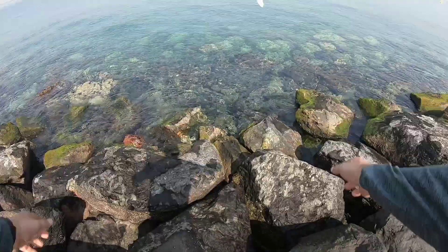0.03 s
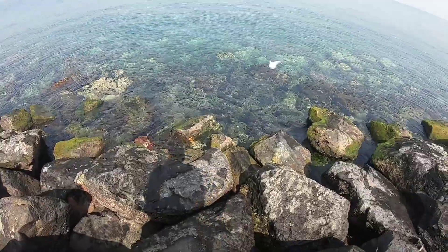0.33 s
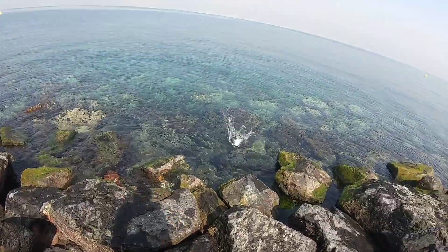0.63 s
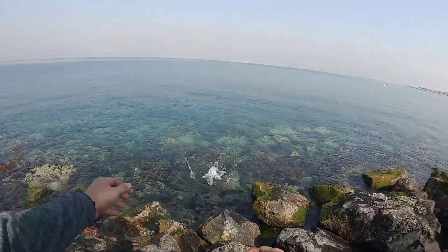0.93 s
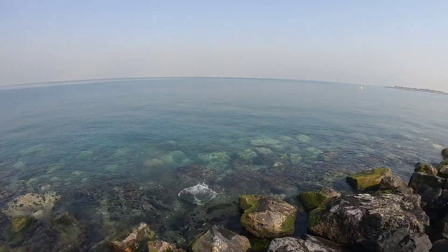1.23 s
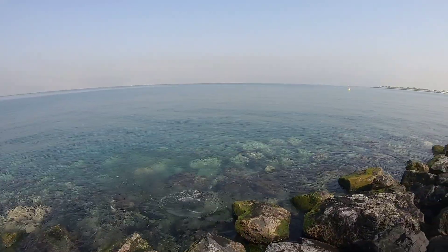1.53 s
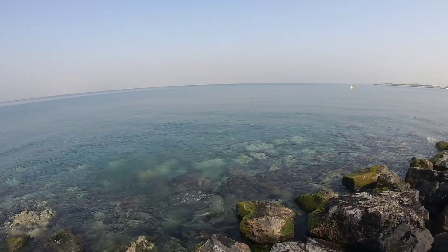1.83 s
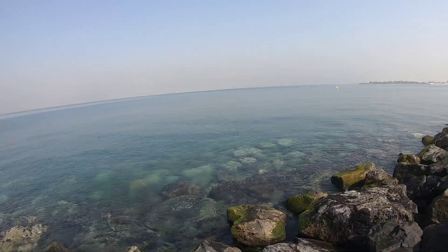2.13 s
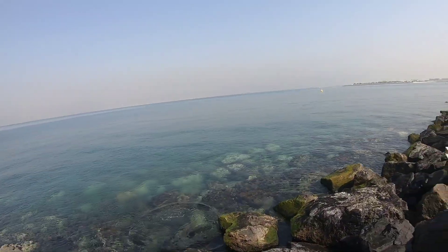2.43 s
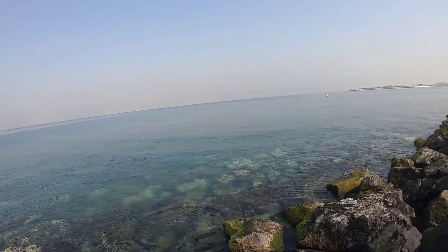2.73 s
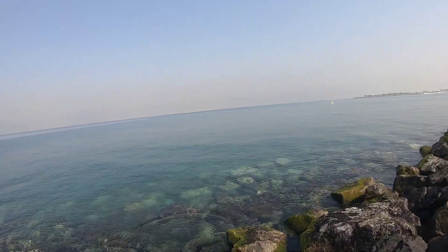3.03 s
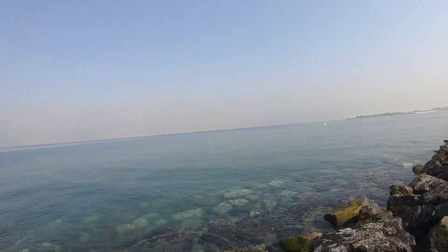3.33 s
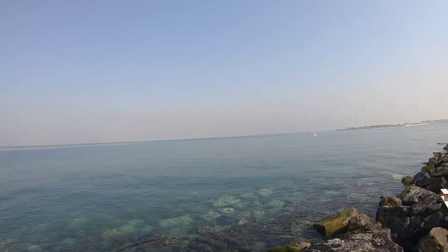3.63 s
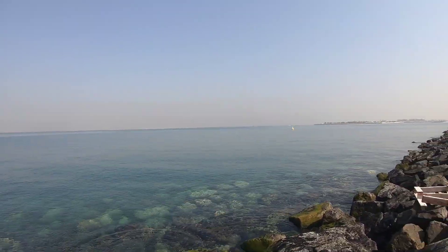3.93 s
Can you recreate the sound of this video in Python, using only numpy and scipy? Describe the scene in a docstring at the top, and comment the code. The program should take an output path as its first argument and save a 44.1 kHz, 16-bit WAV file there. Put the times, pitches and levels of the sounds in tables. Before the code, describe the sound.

Bait plops into the sea, followed by close cloth scraping and bumps over faint lapping.

```python
"""A lump of bait hits a calm sea off a rocky shore: an impact slap, a cavity's gulp, then falling spray.
Drops trap bubbles that ring as small resonators. A sleeve excites the case of a body-worn camera by
stick-slip friction and gear knocks against it; the case shakes the two microphones against each other.
Behind this, wavelets lap and foam among the rocks and light wind buffets the microphone ports.
For a second after the splash the sound is nearly mono."""
import sys
import numpy as np
from scipy import signal
from scipy.fft import rfft, irfft
from scipy.io import wavfile
from scipy.ndimage import uniform_filter1d, map_coordinates

SR = 44100
rng = np.random.default_rng(int(sys.argv[2]) if len(sys.argv) > 2 else 0)


def wav_out(sig):
    """Save sig, one row per channel (or a flat mono array), as 16-bit PCM at SR to the path in sys.argv[1]."""
    wavfile.write(sys.argv[1], SR, np.round(np.clip(np.atleast_2d(sig).T, -1, 1) * 32767).astype(np.int16))


N = 176400

# impact spectrum: f/Hz, relative level/dB
SLAP_SPECTRUM = [(100, -3), (300, 10), (800, 7), (1400, -18), (2200, -0.5), (3000, 0), (4700, -12.5),
                 (6500, -31), (9000, -46), (10600, -69), (12600, -45), (15500, -50)]
ENTRY_S, SLAP_S = .540, .5585


def slap():
    """Water impact: the bait cuts the surface, then slaps it with a short pressure pulse."""
    entry = (1 - burst(ENTRY_S, decay_s=.008)) * burst(ENTRY_S, decay_s=.018)
    force = undb(-32) * entry + undb(-29.5) * burst(SLAP_S, decay_s=.0025)
    return colour(rng.standard_normal(N), SLAP_SPECTRUM) * force


def gulp():
    """Cavity resonance: the air pocket opened by the bait gives a heavily damped, sagging tone."""
    return undb(-24.5) * blip(SLAP_S, hz=258, cycles=.48, glide=-.11)


# spectrum of the falling spray: f/Hz, relative level/dB
SPRAY_SPECTRUM = [(150, -1), (350, 11), (750, 4), (1100, 0.5), (2200, -5.5), (3500, -5.5), (4200, -11),
                  (6000, -14.5), (8500, -27), (10500, -42.5), (13000, -22), (15500, -35)]
# its resonances: f/Hz, bandwidth/Hz, relative level/dB
SPRAY_MODES = [(1440, 89, -15.5), (2076, 270, -12)]
# envelope of the spray and its fizz: t/s, level/dB
SPRAY_LEVEL = [(.53, -71), (.565, -46), (.61, -61.5), (.67, -55.5), (.8, -56), (1.0, -57), (1.2, -54),
               (1.45, -57.5), (1.6, -69.5), (1.9, -103)]


def spray(mist_db=-8, flicker_db=.8):
    """Shot noise: droplets land at random and their impacts add up to a patter."""
    impacts = grains(per_s=800, spread_db=1) + undb(mist_db) * rng.standard_normal(N)
    patter = colour(impacts, SPRAY_SPECTRUM)
    for hz, width_hz, db in SPRAY_MODES:
        patter += undb(db) * ring(grains(per_s=220, spread_db=2.5), hz, width_hz)
    return patter * undb(curve(SPRAY_LEVEL) + flicker_db * walk(per_s=45))


def fizz(rise_per_s=.36):
    """Pitch varies inversely with radius: ever smaller bubbles burst, so the fizz rises for a second."""
    bubbles = ring(grains(per_s=280, spread_db=2.5), hz=3100, width_hz=600)
    pitch_ratio = 1 + rise_per_s * np.minimum(since(SLAP_S), 1)
    rising = map_coordinates(bubbles, [np.cumsum(pitch_ratio)], mode="mirror")
    return rising * undb(curve(SPRAY_LEVEL) - 11)


# single drops and their bubbles: t/s, f/Hz, level/dB
DROPS = [(.648, 377, -39.5), (.657, 3260, -49), (.674, 3070, -47), (.676, 613, -44), (.753, 730, -39),
         (.79, 1960, -50), (.813, 620, -49), (1.019, 326, -43), (1.168, 1000, -50.5), (1.354, 387, -39),
         (1.488, 2340, -50), (1.491, 3300, -51), (1.815, 2560, -66), (1.887, 2480, -60.5),
         (2.134, 935, -49), (2.674, 2920, -48), (2.814, 3050, -55)]


def drops(spatter_db=-10.5):
    """Bubble resonance: each drop spatters and traps air that rings briefly, rising in pitch."""
    out = np.zeros(N)
    for t, hz, db in DROPS:
        spatter = burst(t, decay_s=.0068) * ring(rng.standard_normal(N), hz, width_hz=.37 * hz)
        bubble = blip(t, hz, cycles=3.14 * np.sqrt(hz / 3000), glide=.032)
        out += undb(db) * (undb(spatter_db) * spatter + bubble)
    return out


# broad response of the case: f/Hz, relative level/dB
CASE_SPECTRUM = [(60, -10.5), (200, -2), (450, -1), (750, -2), (1100, 4.5), (1600, -1), (2300, -3.5),
                 (2800, -11), (4000, -18), (5700, -15.5), (7200, -17), (9000, -23), (12000, -34),
                 (15500, -37)]
# its modes: f/Hz, time to fall 60 dB/s, relative level/dB
CASE_MODES = [(1300, 0.025, 5), (1564, 0.031, -13), (2120, 0.036, -1), (3130, 0.075, -35),
              (4020, 0.011, -18)]
# paths to the microphones: f/Hz, left minus right/dB, left phase lead/rad
CASE_PATHS = [(60, -0.5, 0.25), (307, -21, 4.5), (700, -1.5, 2.54), (1550, 0, 2.527), (2500, 0, 2.08),
              (3980, -2, 0.97), (5500, -13, 2.7), (8000, -5.5, 1.8), (12000, 5.5, 2.1)]


def case_response():
    """Structure-borne sound: the case's modes reach each microphone with a different gain and phase."""
    modes = sum(undb(db) * resonance(hz, np.log(1000) / np.pi / t60) for hz, t60, db in CASE_MODES)
    body = response(CASE_SPECTRUM) + modes * tilt(-7.5)
    balance_db, lead = across(CASE_PATHS, col=1), across(CASE_PATHS, col=2)
    both = body * np.array([undb(balance_db / 2) * np.exp(1j * lead), undb(-balance_db / 2)])
    return both / np.sqrt(np.mean(abs(both) ** 2))


# light rubbing of the sleeve: t/s, level/dB
RUSTLE_LEVEL = [(0, -38.5), (.06, -53), (.095, -41), (.13, -50), (.2, -49), (.3, -64.5), (.38, -66),
                (.41, -50), (.48, -59), (.9, -55), (1.7, -67), (2.1, -51), (2.55, -56.5), (2.8, -50.5),
                (3.05, -49.5), (3.25, -49), (3.47, -65.5), (4, -63)]


def rustle(case):
    """Stick-slip friction: cloth drives the case with many tiny slips."""
    slips = grains(per_s=3000, spread_db=2.74)
    return unit(filtered(slips, case * tilt(-4))) * undb(curve(RUSTLE_LEVEL))


# hard stroke of the sleeve: t/s, rasp level/dB, hiss level/dB, rumble level/dB
SCRAPE_LEVELS = [(3.254, -75, -90, -69), (3.258, -29, -57, -39), (3.268, -39, -58, -32.5),
                 (3.285, -32, -63, -22.5), (3.305, -42, -63.5, -33), (3.33, -23.5, -46.5, -27.5),
                 (3.364, -14.5, -28, -20), (3.38, -19, -28.5, -21.5), (3.399, -37.5, -54, -41),
                 (3.41, -34, -48, -32), (3.421, -29, -27.5, -43), (3.434, -49, -44, -49),
                 (3.456, -70, -85, -57)]
# shaking of the mount: f/Hz, relative level/dB
RUMBLE_SPECTRUM = [(20, -22.5), (70, 7), (160, 2), (260, -3.5), (420, -15.5), (650, -12.5), (2000, -64.5)]


def scrape(case, crossover_hz=2940, shared_power=.56):
    """Stick-slip under load: one hard scrape rasps and hisses on the case and shakes the mount."""
    slips = grains(per_s=2500, spread_db=3.74)
    fibres = np.sqrt(shared_power) * slips + np.sqrt(1 - shared_power) * rng.standard_normal((2, N))
    lowpass = 1 / (1 + (freqs() / crossover_hz) ** 8)
    rasp = unit(filtered(slips, case * lowpass)) * undb(curve(SCRAPE_LEVELS, col=1))
    hiss = unit(filtered(fibres, case * (1 - lowpass))) * undb(curve(SCRAPE_LEVELS, col=2))
    shaking = rng.standard_normal(N) + rng.standard_normal((2, N))
    rumble = colour(shaking, RUMBLE_SPECTRUM) * pan(-11) * undb(curve(SCRAPE_LEVELS, col=3))
    in_contact = (since(SCRAPE_LEVELS[0][0]) > 0) * (since(SCRAPE_LEVELS[-1][0]) == 0)
    return in_contact * (rasp + hiss + rumble)


# contacts with the case: t/s; click gain/dB, tilt/(dB per octave), decay/s, cutoff/Hz;
# thump level/dB, f/Hz; mount ring relative to thump/dB; left minus right of thump and ring/dB
KNOCKS = [(.087, -61.5, 8, 0.0067, 10000, -40.5, 415, -5, -16),
          (0.1538, -20, -5.5, 0.0019, 10100, -28, 128, -19, -14.5),
          (0.158, -43, -6, 0.0033, 9000, -32, 220, 0, -16),
          (.184, -37.5, -3.5, 0.0037, 9000, -37, 148, -14, -11),
          (0.404, -36.5, -3, 0.0022, 9000, -52, 203, -20, -7),
          (1.782, -46.5, -8, 0.004, 6000, -38, 172, -7, 1),
          (2.06, -50, -8, .003, 6000, -29.5, 236, -13, -4),
          (2.35, -70, -19, .003, 6000, -29.5, 131, -45, 3),
          (2.670, -48.5, -12, .004, 6000, -38, 224, -9.5, -20),
          (2.728, -37.5, 0, 0.0023, 7000, -61, 200, -14, -12),
          (2.741, -42, -3.5, 0.0036, 7000, -29.5, 206, -12.5, -21.5),
          (2.869, -39, -9.5, 0.0085, 5000, -33, 228, -6.5, -10),
          (2.927, -49, -5, 0.0063, 5001, -33.5, 224, -6, -17),
          (3.019, -42.5, -8.5, 0.0092, 5000, -39, 200, -17, 1),
          (3.188, -42, -3, .004, 6000, -28, 220, -10.5, 8.5),
          (3.289, -11, -0.5, .0015, 9200, -14.5, 69, -18, -15),
          (3.514, -20, 4.5, .0008, 9400, -14, 148.6, -13.5, -18),
          (3.648, -38, 1, .005, 5900, -29, 111, -21, -12),
          (3.713, -27.5, -2, 0.0027, 5500, -12.5, 87.5, -30.5, -3),
          (3.726, -31.5, 1.5, 0.006, 4800, -37, 121.8, -12, -11),
          (3.752, -33.5, 1, 0.0023, 4943, -18, 110, -18, 2.5),
          (3.7602, -23, -1.5, 0.0027, 4250, -46, 110, -19.5, -15.5),
          (3.804, -38, -2, .001, 4500, -38, 200, -9, -0.5),
          (3.8224, -20.5, -1, 0.0011, 4800, -35, 150, -2, 0.5)]


def knocks(case, mount_hz=414, mount_peak_s=.0034, left_lag_s=.0015):
    """Impulse excitation: a contact clicks through the case, duller when soft, and rocks the mount."""
    out = np.zeros((2, N))
    for t, click_db, tilt_db, decay_s, cutoff_hz, thump_db, hz, mount_db, pan_db in KNOCKS:
        contact = rng.standard_normal(N) * burst(t, decay_s)
        softness = 1 / np.sqrt(1 + (freqs() / cutoff_hz) ** 8)
        out += undb(click_db) * filtered(contact, case * tilt(tilt_db) * softness)
        thump = np.array([blip(t + lag, hz, cycles=.5, glide=-.18) for lag in (left_lag_s, 0)])
        mount = undb(mount_db) * blip(t, mount_hz, cycles=mount_hz * mount_peak_s, glide=-.1)
        out += undb(thump_db) * pan(pan_db) * (thump + mount)
    return out


# creaks of the case: t/s, f/Hz, half length/s, level/dB
CREAKS = [(3.293, 1310, 0.0047, -20.5), (3.346, 1570, 0.014, -25), (3.365, 1570, 0.011, -16.5),
          (3.361, 2950, 0.0061, -29.5), (3.381, 2100, 0.011, -21), (3.416, 1510, 0.0095, -21),
          (3.419, 2220, 0.0057, -26.5), (3.516, 1586, 0.00305, -30.5), (3.765, 1100, 0.0037, -37),
          (3.763, 3950, 0.0027, -43)]


def creaks(case):
    """Friction-driven resonance: cloth or gear catches briefly and the case creaks on one pitch."""
    paths = case / np.sqrt(np.mean(abs(case) ** 2, axis=0))  # keeps only balance and phase
    creaking = np.zeros(N)
    for t, hz, half_s, db in CREAKS:
        slips = grains(per_s=2000, spread_db=1)
        creaking += undb(db) * swell(t, half_s) * ring(slips, hz, width_hz=220)
    return filtered(creaking, paths)


# modes of the loose gear: f/Hz, bandwidth/Hz, relative level/dB
GEAR_MODES = [(2730, 260, 1.5), (3650, 350, 5), (3920, 260, 2), (4740, 300, -1.5), (5984, 110, -10)]
# envelope of its rattle: t/s, level/dB
GEAR_LEVEL = [(3.45, -110), (3.53, -70.5), (3.68, -84.5), (3.73, -56), (3.79, -77.5), (3.823, -52),
              (3.85, -87), (3.91, -71), (3.94, -83.5), (3.98, -64.5)]


def gear():
    """Modal ringing: small collisions make loose fishing gear rattle faintly around the last knocks."""
    chatter = np.array([grains(per_s=400, spread_db=4) for _ in range(2)])
    ringing = sum(undb(db) * ring(chatter, hz, width_hz) for hz, width_hz, db in GEAR_MODES)
    return unit(ringing) * undb(curve(GEAR_LEVEL))


# spectrum of the wind on the ports: f/Hz, relative level/dB
WIND_SPECTRUM = [(15, -12), (35, -3), (55, -3), (90, -8), (140, -15.5), (250, -21), (500, -40), (2000, -75)]
# envelope of the gusts: t/s, relative level/dB
WIND_LEVEL = [(0.0, -24), (.03, -37.5), (0.11, -46), (0.14, -39.5), (0.37, -60), (1.2, -46), (2.18, -44),
              (2.23, -36), (2.48, -48.5), (2.61, -33), (2.64, -45.5), (3.24, -35), (3.3, -22), (3.48, -50),
              (3.52, -23), (3.62, -58.5), (3.72, -26), (3.87, -55), (4.0, -32.5)]


def wind(gain_db=-2.5, buffet_db=3, shared_power=.44):
    """Turbulence: eddies press on the two microphone ports, partly in common."""
    shared = np.sqrt(shared_power) * rng.standard_normal(N)
    local = np.sqrt(1 - shared_power) * rng.standard_normal((2, N))
    level_db = curve(WIND_LEVEL) + gain_db + buffet_db * walk(per_s=12)
    return colour(shared + local, WIND_SPECTRUM) * undb(level_db) * pan(-7)


# spectrum of the sea wash: f/Hz, relative level/dB
SEA_SPECTRUM = [(40, -15.5), (100, -3.5), (200, -2), (400, -8), (600, -19), (1000, -24.5), (2000, -28),
                (2800, -37.5), (4000, -33.5), (6000, -51.5), (10000, -58.5), (15500, -58.5)]
# its envelope: t/s, level/dB
SEA_LEVEL = [(0, -59), (.5, -48), (1.1, -55), (1.65, -48), (1.85, -54.5), (2.2, -54), (3.2, -53.5),
             (3.5, -63), (4, -57)]


def sea(flicker_db=1, side_db=-9):
    """Modulated noise: wavelets wash and trickle among the rocks, each octave varying on its own."""
    water = rng.standard_normal(N) + grains(per_s=460, spread_db=3)
    wash = np.zeros(N)
    for hz in np.geomspace(50, 12800, num=9):
        octave = filtered(water, abs(resonance(hz, hz / 2)) ** 2)
        wash += octave * undb(flicker_db * walk(per_s=14))
    side = undb(side_db) * colour(rng.standard_normal(N), SEA_SPECTRUM) * np.array([[1], [-1]])
    return (colour(wash, SEA_SPECTRUM) + side) * undb(curve(SEA_LEVEL))


# short pitched gurgles of water: t/s, f/Hz, half length/s, level/dB
GURGLES = [(0.032, 1300, 0.067, -58.5), (0.017, 2000, .04, -63), (.41, 3100, 0.014, -61),
           (0.574, 220, 0.013, -46), (0.69, 485, 0.041, -53.5), (1.683, 1670, 0.033, -66.5),
           (2.3, 330, 0.021, -58), (2.365, 1060, 0.0055, -61.5), (2.4, 2050, .018, -63),
           (2.555, 2040, .045, -64.5), (2.62, 1190, 0.11, -63), (2.92, 425, 0.021, -52.5),
           (3.043, 482, .04, -53.5)]


def gurgles():
    """Damped resonance: water from the splash and from lapping wavelets gives short pitched gurgles."""
    out = np.zeros(N)
    for t, hz, half_s, db in GURGLES:
        trickle = grains(per_s=900, spread_db=2)
        out += undb(db) * swell(t, half_s) * ring(trickle, hz, width_hz=.16 * hz)
    return out


# envelope of the foam: t/s, level/dB
FOAM_LEVEL = [(1.9, -100), (2.3, -85), (3.08, -80.5), (3.18, -74), (3.45, -78.5), (3.55, -100)]


def foam():
    """Shot noise: dense tiny pops merge into a hiss as a foaming wavelet climbs the rocks."""
    pops = grains(per_s=4000, spread_db=3) + rng.standard_normal((2, N))
    return ring(pops, hz=7300, width_hz=7000) * undb(curve(FOAM_LEVEL))


# envelope of the drone: t/s, level/dB
DRONE_LEVEL = [(0, -64), (.7, -59), (1.25, -45), (1.6, -52.5), (2.1, -51.5), (4, -60.5)]


def drone():
    """Narrow-band noise: a low drone swells and fades."""
    return ring(rng.standard_normal(N), hz=94, width_hz=26) * undb(curve(DRONE_LEVEL))


def undb(db):
    """Amplitude ratio of a level."""
    return 10 ** (np.asarray(db) / 20)


def unit(x):
    """Normalisation to rms 1."""
    return x / np.sqrt(np.mean(x ** 2))


def pan(db):
    """Channel gains for a level difference, left minus right."""
    return undb(np.array([[db], [-db]]) / 2)


def curve(rows, col=1):
    """Linear interpolation of a time table at every sample."""
    rows = np.array(rows)
    return np.interp(np.arange(N) / SR, rows[:, 0], rows[:, col])


def freqs():
    """Bin frequencies in Hz, at least 1."""
    return np.maximum(np.arange(N // 2 + 1) * SR / N, 1)


def across(rows, col=1):
    """Log-frequency interpolation of a table at every bin."""
    rows = np.array(rows)
    return np.interp(np.log(freqs()), np.log(rows[:, 0]), rows[:, col])


def response(rows):
    """Minimum-phase response of a spectrum table, by folding the cepstrum."""
    cepstrum = irfft(np.log(undb(across(rows))), N)
    cepstrum[1:N // 2] *= 2
    cepstrum[N // 2 + 1:] = 0
    return np.exp(rfft(cepstrum))


def filtered(x, gain):
    """Convolution as a product of spectra."""
    return irfft(rfft(x) * gain, N)


def colour(x, rows):
    """Spectral shaping by a table, to rms 1."""
    return unit(filtered(x, response(rows)))


def resonance(hz, width_hz):
    """Second-order band-pass response, gain 1 at the centre."""
    return 1 / (1 + 1j * (freqs() ** 2 - hz ** 2) / (freqs() * width_hz))


def ring(x, hz, width_hz):
    """Forced response of two like resonators in cascade, to rms 1."""
    return unit(filtered(x, resonance(hz, width_hz) ** 2))


def tilt(db_per_octave, pivot_hz=1500):
    """Spectral slope starting two octaves below the pivot."""
    return undb(db_per_octave * np.log2(np.maximum(freqs() / pivot_hz, .25)))


def walk(per_s):
    """Slow random fluctuation of rms 1."""
    hold = int(SR / per_s)
    steps = np.repeat(rng.standard_normal(N // hold + 1), hold)
    return unit(uniform_filter1d(steps, hold)[:N])


def grains(per_s, spread_db):
    """Random impulse train of rms 1, a few impulses much larger than the rest."""
    hits = rng.random(N) < per_s / SR
    signs = rng.choice([-1, 1], N)
    sizes_db = spread_db * np.minimum(rng.exponential(size=N), np.log(100))
    return unit(hits * signs * undb(sizes_db))


def since(start):
    """Seconds since an onset, zero before it."""
    return np.maximum(np.arange(N) / SR - start, 0)


def burst(start, decay_s):
    """Step onset with exponential decay."""
    t = since(start)
    return (t > 0) * np.exp(-np.minimum(t / decay_s, 20))


def swell(centre, half_s):
    """Bell-shaped envelope with standard deviation half_s."""
    return np.exp(-.5 * np.minimum(((np.arange(N) / SR - centre) / half_s) ** 2, 60))


def blip(start, hz, cycles, glide):
    """Damped oscillation that peaks after `cycles` periods; its pitch shifts by the fraction `glide`."""
    age = np.minimum(since(start) * hz / cycles, 20)
    phase = cycles * (age + glide * (age - 2 + 2 * np.exp(-age / 2)))
    return age * np.exp(1 - age) * np.sin(2 * np.pi * phase)


def scene():
    """Superposition of water, air and handling sounds."""
    water = sea() + gurgles() + foam()
    splash = slap() + gulp() + spray() + fizz() + drops()
    air = wind() + drone()
    case = case_response()
    handling = rustle(case) + scrape(case) + creaks(case) + knocks(case) + gear()
    return splash + handling + air + water


# stereo width: t/s, side gain/1
STEREO_WIDTH = [(.4, 0.71), (.6, 0.19), (.85, 0.0097), (1.75, 0.0077), (1.79, 0.26), (2.3, 0.67)]


def record(dry, cutoff_hz=15800):
    """Mid-side scaling narrows the image, most after the splash; a steep low-pass cuts the top."""
    mid = (dry[0] + dry[1]) / 2
    side = (dry[0] - dry[1]) / 2 * curve(STEREO_WIDTH)
    lowpass = signal.ellip(10, .2, 80, cutoff_hz, fs=SR, output="sos")
    return signal.sosfilt(lowpass, np.array([mid + side, mid - side]))


dry = scene()
out = record(dry)
wav_out(out)
```